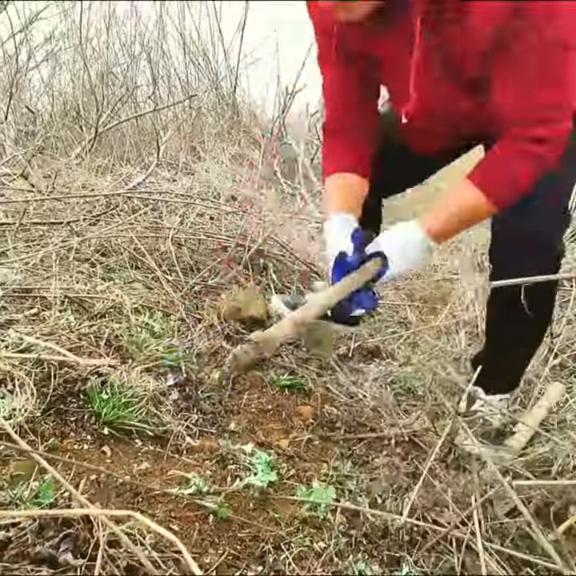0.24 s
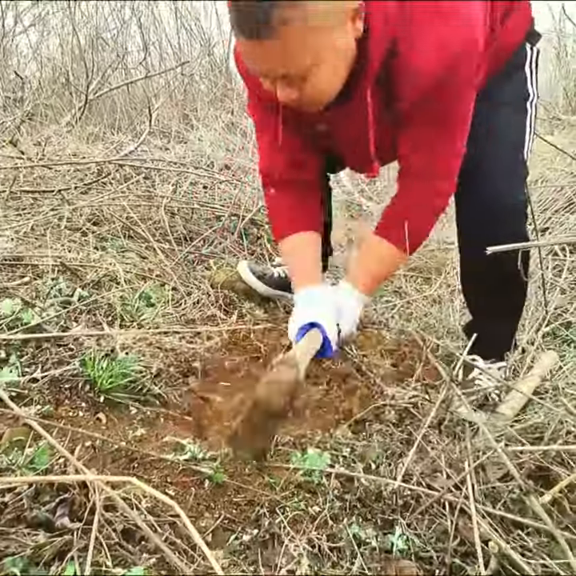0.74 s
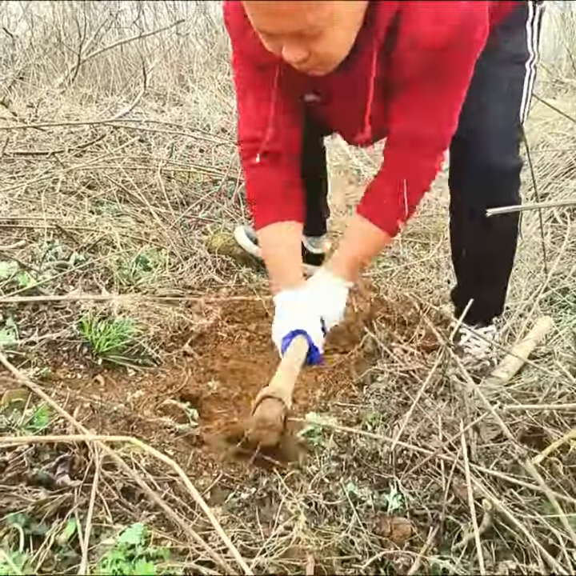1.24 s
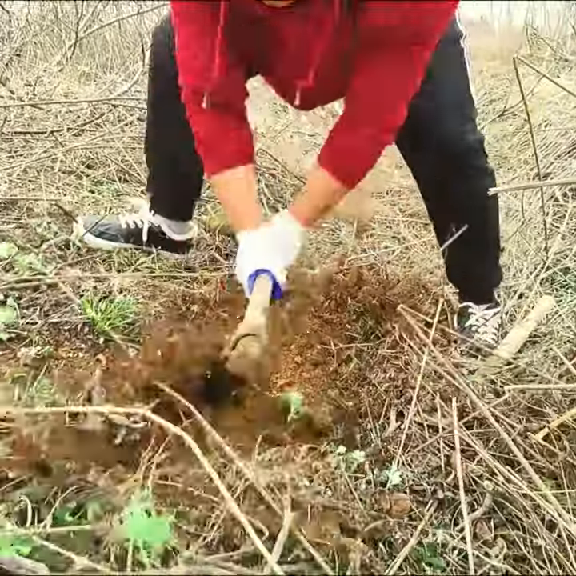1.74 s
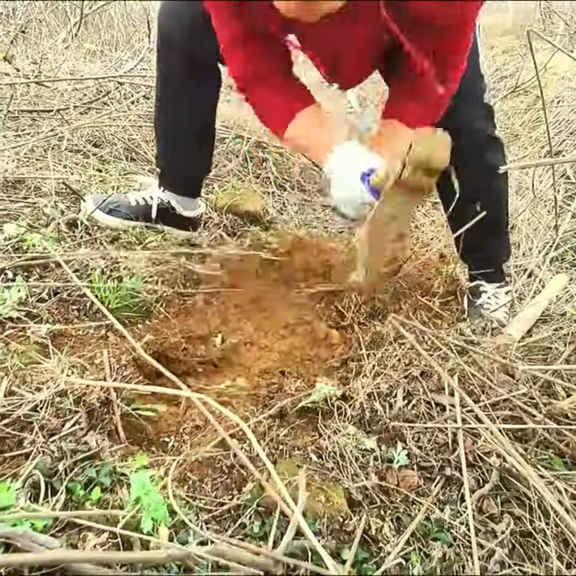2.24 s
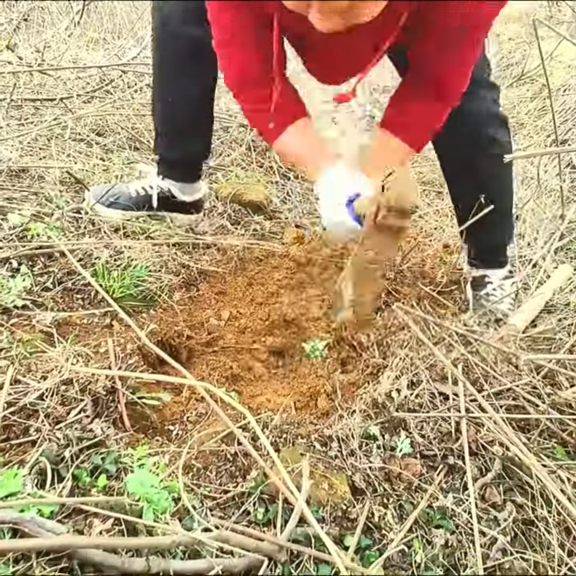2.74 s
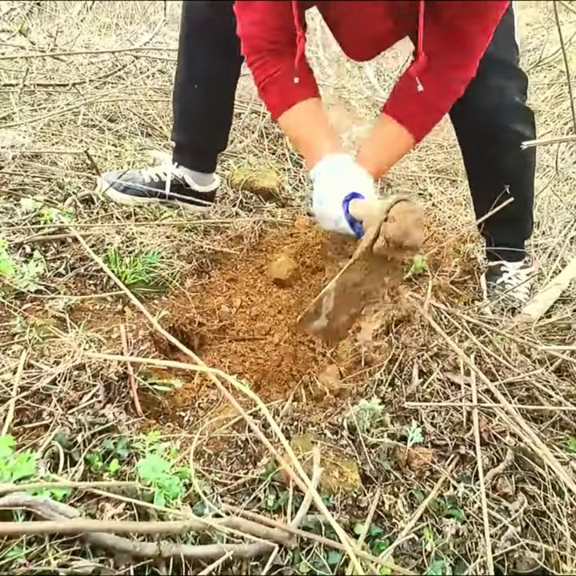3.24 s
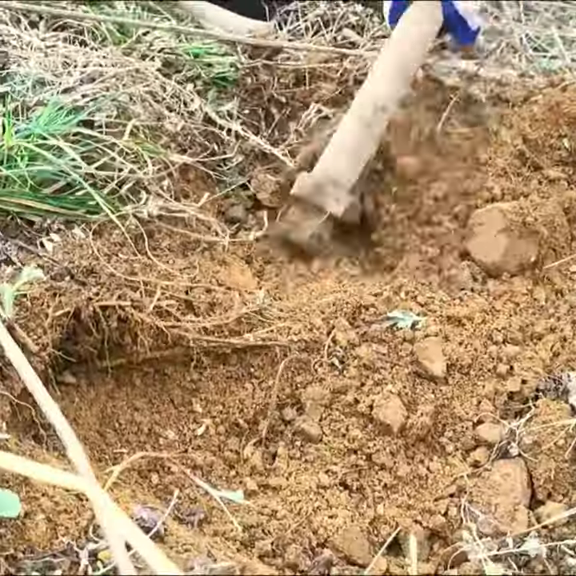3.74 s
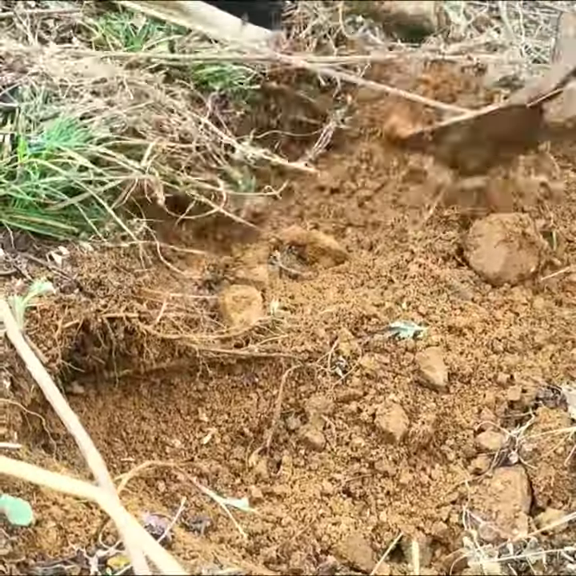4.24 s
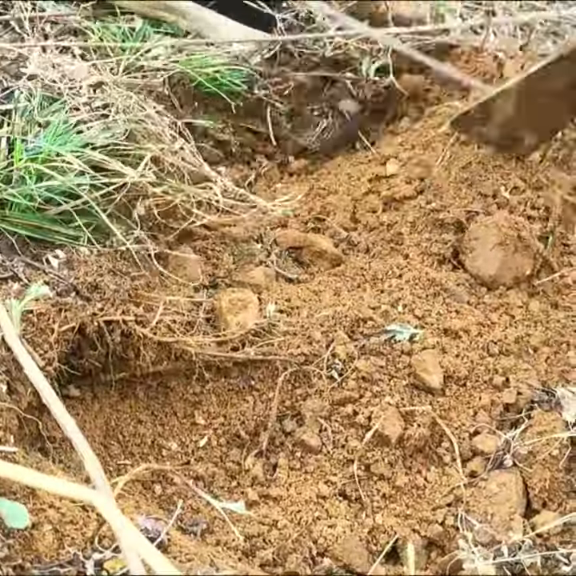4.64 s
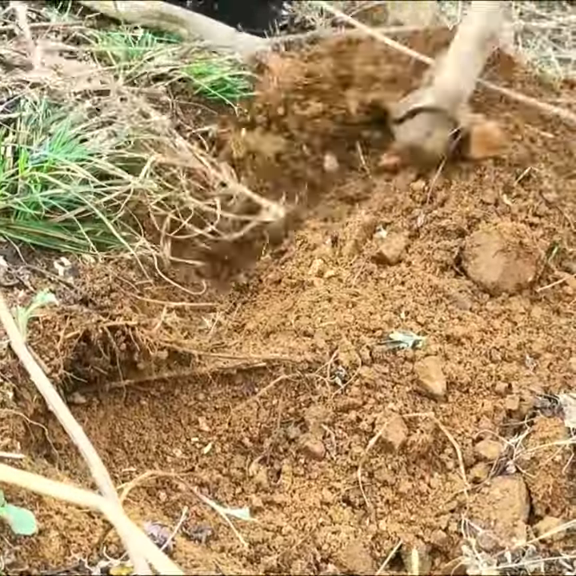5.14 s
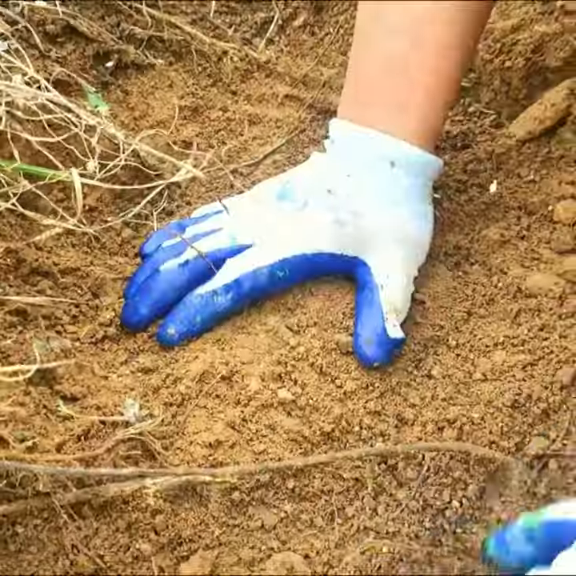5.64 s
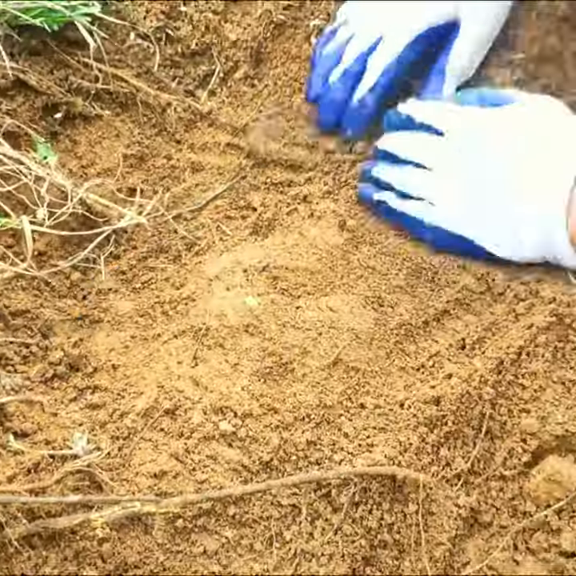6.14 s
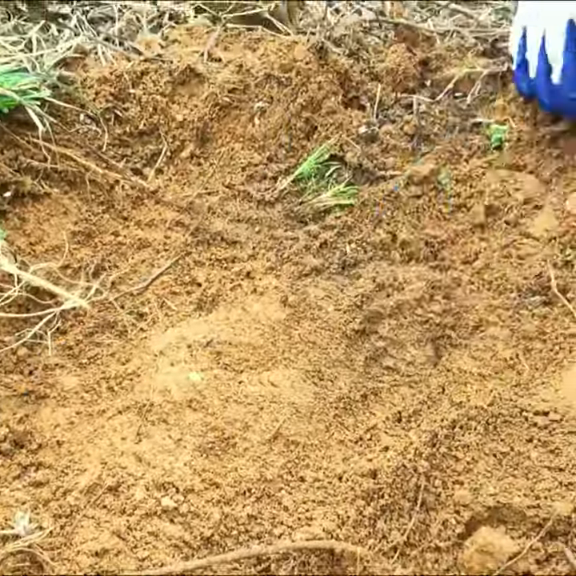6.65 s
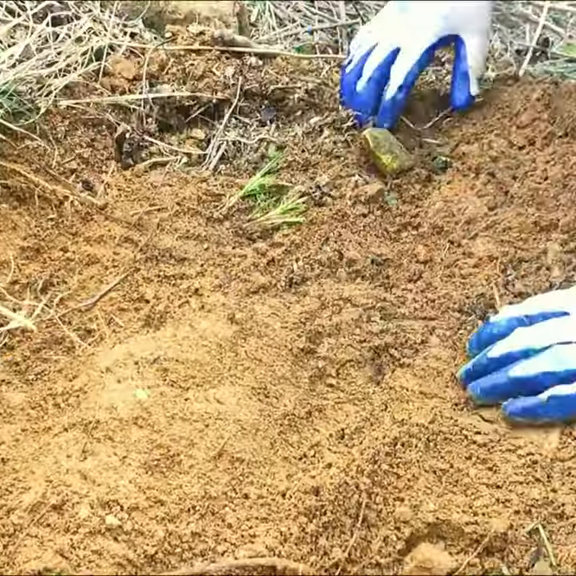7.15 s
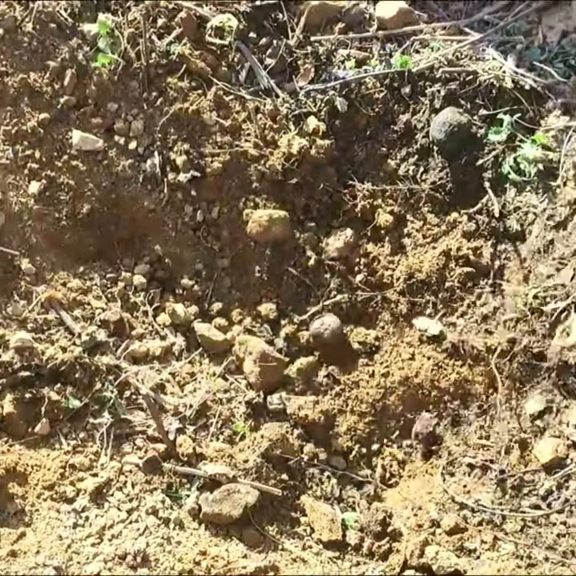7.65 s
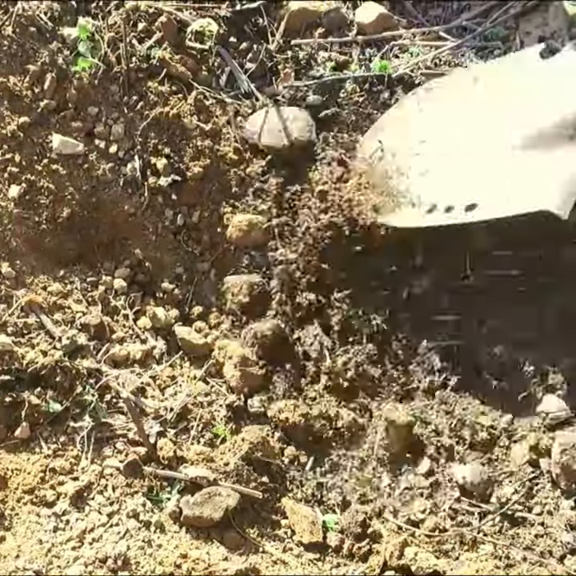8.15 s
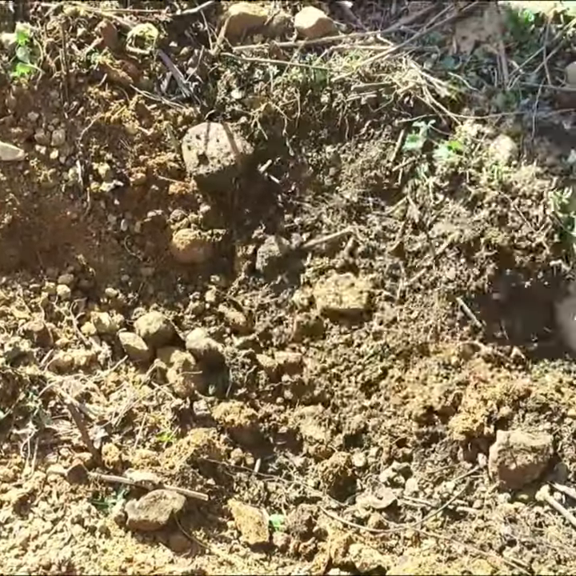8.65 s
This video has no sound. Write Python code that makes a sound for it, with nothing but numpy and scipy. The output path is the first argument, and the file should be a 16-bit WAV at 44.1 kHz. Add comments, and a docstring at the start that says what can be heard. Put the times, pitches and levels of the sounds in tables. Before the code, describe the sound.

Close, dry outdoor sound in stereo, with only a very faint low drone and hiss. From 0 to 0.4 s, dry grass and loose soil rustle and crackle. From 0.5 to about 3.1 s a hoe chops fast and irregularly, roughly five blows a second: short, crisp crunches with bright grit, thrown crumbs, and sharp pebble and twig clicks, the last ones weaker and duller. A tiny dip comes near 3.4 s. From 3.6 to 5.3 s closer, thuddier, earthy chops follow, with less spray; the last knock leaves a barely audible ring. After another dip at 5.5 s, gloved hands softly pat and sweep sandy soil until 7.2 s, much quieter. A third dip at 7.3 s leads to loud, coarse shovel stabs from 7.5 to 8.9 s, strongest around 7.8 to 8.1 s, crunching through stones with damped steel resonance, trickling soil and a final rough sweep.

```python
"""A hoe chops dry, crumbly earth at a quick pace: swelling bursts of crushed crumbs, each with its own tone colour,
and thrown soil. Softer, slower bursts are gloved hands patting the loose earth; harder ones that also excite the
blade's resonances are a steel shovel stabbing into stony ground. Soil trickles and rubs after the blades and in
sweeps, as fine fractures over hiss; pebbles and twigs give single cracks with a short crunch.
Filtered noise makes a faint outdoor drone, hum and hiss underneath; the level dips briefly three times."""
import sys
import numpy as np
from scipy import signal
from scipy.fft import rfft, irfft, next_fast_len
from scipy.io import wavfile
from scipy.ndimage import map_coordinates

SR = 44100
rng = np.random.default_rng(int(sys.argv[2]) if len(sys.argv) > 2 else 0)


def waveform_to_disk(signal):
    """Save audio, clipped to [-1, 1], as 16-bit WAV at the path in sys.argv[1]."""
    frames = np.transpose(np.atleast_2d(signal))
    scaled = np.clip(frames, -1, 1) * 32767
    samples = np.round(scaled).astype(np.int16)
    wavfile.write(sys.argv[1], SR, samples)


N = 391608

# Hoe strokes. Each row: peak in seconds, level in dB before the layer trim, fade in seconds per 10 dB,
# thud, grit and air (top treble) in dB, tone colour in Hz, thrown soil in dB before the trickle trim.
HOE_STROKES = [(0.492, -30, .011, -8, 2, 3, 3000, -46), (0.702, -43.7, .018, -1, -3, -5, 1720, -56),
               (0.889, -34.3, .005, -3, 0, 1, 1750, -58), (0.924, -43.5, .008, -10, -6, -12, 1880, -53),
               (1.201, -32.3, .0043, 1, 5, 3, 1040, -52), (1.376, -35.9, .009, -3, 1, 3, 400, -50),
               (1.578, -35.3, .02, -6, -4, -4, 1790, -51), (1.744, -44.5, .0055, 5, 6, 8, 950, -55),
               (1.816, -32, .008, -1, 1, 7, 2570, -50), (1.843, -33.3, .022, -5, 6, 12, 3000, -45),
               (1.998, -31.7, .0127, 0, -1, 4, 990, -52), (2.205, -33.8, .0065, -3, 3, 2, 2560, -51),
               (2.409, -32.1, .0085, -4, -1, -2, 2390, -48), (2.615, -37.3, .016, 1, 3, -3, 1000, -61),
               (2.748, -51, .008, 5, -4, 1, 920, -75), (2.925, -37.5, .009, 4, -7, -9, 560, -64),
               (2.993, -50, .0086, 2, -5, -8, 2550, -65), (3.128, -47, .009, 2, 0, 2, 2980, -60),
               (3.572, -45.3, .01, -1, -3, -3, 1920, -62), (3.864, -29.8, .01, -7, -1, -4, 2000, -61),
               (4.066, -32.5, .0095, -2, -5, -10, 1960, -61), (4.246, -33, .009, 4, -8, -13, 700, -60),
               (4.309, -42.4, .005, -3, -4, -13, 1870, -67), (4.437, -31.8, .008, 0, -5, -6, 720, -61),
               (4.626, -37.7, .01, 4, -5, -7, 700, -60), (4.654, -46, .011, 5, -9, -14, 690, -66),
               (4.828, -30.4, .01, -1, 1, -4, 1590, -62), (4.887, -48, .008, 4, -2, -2, 2040, -68),
               (5.025, -31.7, .0105, 1, 0, -4, 420, -65), (5.067, -45.5, .014, 5, -6, -4, 2350, -68),
               (5.223, -41.6, .009, 5, -6, -6, 2530, -66), (5.296, -43.3, .0044, -4, -5, -8, 760, -68)]
# Shovel strokes. Each row: peak in seconds, level in dB before the layer trim, swell and fade in seconds per 10 dB,
# thud, grit and air in dB, tone colour in Hz, left-right balance in dB.
SHOVEL_STROKES = [(7.507, -30, .007, .007, 6, 6, -2, 400, 8.6),
                  (7.595, -33.2, .015, .011, 2, 2, 1, 1500, 4.9),
                  (7.821, -25.7, .0073, .01, 2, -4, -3, 2460, -4.9),
                  (7.911, -28.3, .018, .0104, -4, 0, -4, 1600, 2.8),
                  (8.07, -26.4, .0073, .0073, 2, 0, 5, 950, -3),
                  (8.108, -35.5, .008, .01, 1, -2, -3, 3230, 3.4),
                  (8.218, -39.1, .0175, .018, -1, 2, 1, 1150, 4.1),
                  (8.262, -35.2, .012, .009, -5, -1, -5, 1280, 0),
                  (8.395, -31.2, .0085, .007, -4, 2, 3, 1460, -.5),
                  (8.492, -42.9, .019, .008, 0, 0, -3, 1050, 4.3),
                  (8.537, -47.5, .019, .012, 1, 3, -2, 2520, 2.5),
                  (8.592, -47.8, .012, .009, -10, 2, 0, 1080, 4.4),
                  (8.719, -32.9, .008, .0053, 0, -2, -2, 1000, 4.8),
                  (8.786, -43.3, .005, .011, 4, -1, -5, 950, 3),
                  (8.849, -40.9, .014, .012, 5, 0, -3, 1110, 2.6)]


def amp(db):
    """Decibels to gain."""
    return 10 ** (np.asarray(db) / 20)


def unit(x):
    """Scaled to rms 1."""
    return x / np.sqrt(np.mean(x ** 2) + 1e-20)


def along(points, hz):
    """Points of (Hz, value) read on a log frequency axis."""
    f, v = np.transpose(points)
    return np.interp(np.log(hz + 1), np.log(f + 1), v)


def curves(rows):
    """One value per sample for each column after the time."""
    s, *cols = np.transpose(rows)
    return [np.interp(np.arange(N) / SR, s, c) for c in cols]


def wobble(rate, size):
    """A smooth random curve with rate knots a second."""
    knots = rng.standard_normal(int(size * rate / SR) + 4)
    return map_coordinates(knots, [np.arange(size) * rate / SR])


def bump(hz, centre_hz, width_hz):
    """The shape of one resonance, 1 at its centre."""
    return 1 / (1 + ((hz - centre_hz) / width_hz) ** 2)


def swell(t, rise_s, fade_s):
    """A rounded peak at t = 0 whose flanks approach a slope of 10 dB per given time."""
    return amp(-10 * (np.hypot(t / np.where(t < 0, rise_s, fade_s), .5) - .5))


def coloured(x, gain_db):
    """Passes x through a causal minimum-phase filter whose gain in dB is a function of frequency."""
    n = x.shape[-1]
    m = 2 * next_fast_len(n // 2 + 2048)
    cepstrum = irfft(np.log(amp(gain_db(np.fft.rfftfreq(m, 1 / SR)))), m)
    # folding the cepstrum onto positive times makes the filter causal
    cepstrum[..., 1:m // 2] *= 2
    cepstrum[..., m // 2 + 1:] = 0
    return irfft(rfft(x, m) * np.exp(rfft(cepstrum)), m)[..., :n]


def crumbs(size, rate, spread_db, smooth):
    """Tiny fractures of uneven size, rate a second on average, over the smooth hiss of fine sand."""
    loudness = amp(spread_db * np.minimum(rng.exponential(size=size), 4))
    fractures = loudness * rng.choice([-1, 1], size) * (rng.random(size) < rate / SR)
    return unit(unit(fractures) + smooth * rng.standard_normal(size))


def scattered(x, scatter_db, t60, lag_s):
    """Stereo: the direct sound, on average slightly later at the left, plus treble scattered by the rough ground."""
    t = np.arange(SR // 25) / SR
    tail = rng.standard_normal((2, len(t))) * amp(-60 * t / t60)
    tail = coloured(tail, lambda hz: along([(200, -8), (900, -2), (2500, 1)], hz))
    paths = amp(scatter_db) * tail / np.linalg.norm(tail, axis=1, keepdims=True)
    lag = int(np.clip(rng.normal(lag_s, 7e-5) * SR, -12, 12))
    paths[0, max(lag, 0)] += 1
    paths[1, max(-lag, 0)] += 1
    return signal.fftconvolve(x[None], paths, axes=1)[:, :len(x)]


def panned(pair, pan_db):
    """Shifts the balance at equal power; positive is left."""
    gain = amp([[pan_db / 2], [-pan_db / 2]])
    return pair * unit(gain)


def bearing(bright_db):
    """Left-right dB of a contact: crisp dry grass lies to the left, dull bare soil to the right."""
    return 2.1 + .33 * bright_db


def add(track, s, pair):
    """Mixes a sound into the track from time s."""
    start = round(s * SR)
    part = pair[:, max(-start, 0):max(N - start, 0)]
    track[:, max(start, 0):][:, :part.shape[1]] += part


def outdoors(drone_gain_db, hum_gain_db, hiss_db):
    """A far drone and hum, nearly alike in both channels, and a faint even hiss, all of filtered noise."""
    # Distant noise. Each row: time in seconds, deep drone and hum in dB before their trims.
    rumble = [(0, -90, -88), (2.6, -88, -85), (3, -77, -79), (3.8, -72, -75), (4.4, -72, -74),
              (4.8, -72, -70), (5.42, -70.5, -69), (5.55, -80, -77), (6.7, -79, -76), (7.6, -84, -81),
              (8.88, -83, -79)]
    # Spectra of the drone, the hum and the hiss. Each row: frequency in Hz, gain in dB.
    drone_spectrum = [(20, -16), (45, -9), (62, -2), (78, 1), (105, -10), (200, -26), (600, -50)]
    hum_spectrum = [(60, -25), (120, -9), (160, 1), (220, -5), (320, -3), (410, -12), (1000, -24),
                    (3000, -45)]
    hiss_spectrum = [(100, 0), (500, 0), (1500, -3), (5000, -8), (8300, -9), (9500, -14), (15500, -18)]

    def far(spectrum):
        shared = rng.standard_normal(N)
        noise = shared + .4 * rng.standard_normal((2, N))
        return unit(coloured(noise, lambda hz: along(spectrum, hz)))

    drone_db, hum_db = curves(rumble)
    drone = far(drone_spectrum) * amp(drone_db + drone_gain_db)
    hum = far(hum_spectrum) * amp(hum_db + hum_gain_db)
    hiss = unit(coloured(rng.standard_normal((2, N)), lambda hz: along(hiss_spectrum, hz)))
    return drone + hum + amp(hiss_db) * hiss


def soil_flow():
    """Gains of trickle and rub: blades drag and throw soil, sweeps stir it; their powers add."""
    # Sweeps of a hand, foot or blade through grass and loose soil. Each row: peak in seconds,
    # trickle and rub in dB before their trims, swell and fade in seconds per 10 dB.
    sweeps = [(0.06, -41, -53, .035), (0.145, -48, -63, .025), (0.26, -42, -58, .04),
              (0.412, -46, -60, .018), (0.795, -50, -69, .05), (1.005, -52, -65, .02),
              (1.455, -52, -62, .025), (1.69, -53, -64, .04), (2.143, -45, -65, .017),
              (3.41, -59, -71, .035), (3.67, -60, -61, .07), (3.765, -59, -70, .025),
              (4.035, -56, -66, .02), (4.56, -60, -68, .03), (5.37, -67, -67, .12), (5.595, -55, -62, .027),
              (5.76, -53.5, -59, .04), (5.92, -53.5, -62, .035), (6.04, -63, -64, .07),
              (6.26, -60, -63, .06), (6.42, -58, -65, .035), (6.61, -61, -65, .05),
              (6.955, -54.5, -65, .065), (7.22, -57.5, -68, .022), (7.385, -52.5, -66, .042),
              (7.65, -57, -63, .02), (8.14, -57, -54, .03), (8.47, -58, -57, .03), (8.79, -55, -53, .02),
              (8.88, -47.5, -50, .03)]
    # A faint background rustle, varying slowly in level. Each row: time in seconds, rub in dB before its trim.
    rest_rub = [(0, -77), (2.9, -76), (3.6, -72), (5.2, -70), (7.1, -71), (7.9, -75), (8.88, -74)]
    throw_s, rise_s, settle_s = .042, .03, .044  # thrown soil: delay in s, swell and settling in s per 10 dB
    drag_db, drag_s, drag_fade_s = -26, .035, .042  # dragged soil: dB against the stroke, delay in s, s per 10 dB
    spill_db = -35  # soil running off the shovel, against its stroke
    rest_trickle_db = -75  # a faint, steady background hiss, before the trim

    t = np.arange(0, N / SR, .002)
    throws = [(row[0], row[-1]) for row in HOE_STROKES]
    throws += [(s, db + spill_db) for s, db, *_ in SHOVEL_STROKES]
    trickle = [amp(db) * swell(t - s - throw_s, rise_s, settle_s) for s, db in throws]
    rub = [amp(db + drag_db) * swell(t - s - drag_s, rise_s, drag_fade_s) for s, db, *_ in HOE_STROKES]
    rub += [amp(db + spill_db) * swell(t - s, rise_s, drag_fade_s) for s, db, *_ in SHOVEL_STROKES]
    for s, trickle_db, rub_db, length in sweeps:
        shape = swell(t - s, length, length)
        trickle.append(amp(trickle_db) * shape)
        rub.append(amp(rub_db) * shape)

    def total(parts, rest_db):
        return np.hypot(np.linalg.norm(parts, axis=0), amp(rest_db))

    rest_rub_db = np.interp(t, *np.transpose(rest_rub))
    return curves(np.transpose([t, total(trickle, rest_trickle_db), total(rub, rest_rub_db)]))


def loose_soil(trickle_flow, rub_flow, trickle_gain_db, rub_gain_db):
    """Fine crumbs patter on dry stalks while the mass of soil rubs along the ground."""
    # Spectra of the trickle and the rub. Each row: frequency in Hz, gain in dB.
    trickle_spectrum = [(300, -36), (1500, -15), (3000, -5), (4200, -2.5), (6000, -2), (7400, -1),
                        (8300, 1), (9400, -7), (12000, -7.5), (15500, -11)]
    rub_spectrum = [(60, -22), (200, -6), (400, -2), (1000, -2), (2000, 0), (3000, -2), (5000, -12),
                    (12000, -40)]

    # some crumbs are heard in both channels, most are scattered and differ
    near = crumbs(N, rate=400, spread_db=5.2, smooth=.65)
    wide = np.array([crumbs(N, rate=1800, spread_db=4.5, smooth=.95) for _ in range(2)])
    patter = (.6 * near + wide) * amp(1.5 * wobble(70, size=N))
    trickle = unit(coloured(patter, lambda hz: along(trickle_spectrum, hz)))

    # the sliding mass is uneven, and its bass is nearly alike in both channels
    mass = crumbs(N, rate=600, spread_db=4.5, smooth=.7)
    grit = np.array([crumbs(N, rate=900, spread_db=4.5, smooth=.8) for _ in range(2)])
    drag = coloured(mass, lambda hz: along([(500, 3), (2500, -7)], hz))
    drag = drag + coloured(grit, lambda hz: along([(200, -7), (1500, 0)], hz))
    rub = unit(coloured(drag * amp(1.8 * wobble(45, size=N)), lambda hz: along(rub_spectrum, hz)))

    trickle = panned(trickle, pan_db=2) * trickle_flow * amp(trickle_gain_db)
    return trickle + panned(rub, pan_db=1.5) * rub_flow * amp(rub_gain_db)


def small_ticks(flow, count):
    """Click rows for faint twigs and crumbs at random, likelier and louder where more soil trickles."""
    chance = np.cumsum(flow)
    at = np.searchsorted(chance, chance[-1] * (np.arange(count) + rng.random(count)) / count)
    rows = []
    for i, (a, b, c) in zip(at, rng.standard_normal((count, 3))):
        level_db = 20 * np.log10(flow[i]) - 4 + 2 * a
        rows.append((i / SR, level_db, 2.5 + 3 * b, 5 + 3 * c))
    return rows


def pebbles_and_twigs(trickle_flow, level_db, crunch, crunch_t60):
    """Each pebble struck or twig snapped gives one sharp crack and a few milliseconds of crunch."""
    # The loudest clicks. Each row: start in seconds, level in dB before the trim, knock and brightness in dB.
    loud_clicks = [(0.0529, -41.6, -2, 5), (0.0983, -43.4, 4, 7), (0.1312, -45.5, -2, 5),
                   (0.3198, -48, -1, 8), (0.426, -38.1, 0, 9), (0.4959, -26.9, -10, 8),
                   (0.5103, -41.7, -8, -9), (0.5522, -42.9, 3, 9), (0.706, -41, 2, -1),
                   (0.7388, -44.8, -2, 0), (0.8141, -40.4, -2, 9), (0.8875, -24.5, -4, 5),
                   (0.9234, -40.2, -7, 0), (1.201, -30.9, 3, 5), (1.2422, -40.5, 0, 2), (1.2726, -47, 3, 9),
                   (1.3759, -34.8, -6, 4), (1.3825, -38.2, 3, 6), (1.4517, -45.8, -2, 9),
                   (1.5375, -47.5, 2, 9), (1.5894, -34.4, -2, -4), (1.5989, -38.9, -1, -2),
                   (1.7755, -45, 1, 9), (1.8139, -28.3, 0, 6), (1.989, -34.3, 3, 6), (2.001, -27.4, 1, 2),
                   (2.1601, -46.7, 4, 6), (2.2045, -26, 1, 8), (2.2723, -44.8, -1, -6),
                   (2.4145, -34.9, 1, 0), (2.6205, -29.5, 4, 5), (2.7463, -44.1, 13, -4),
                   (2.9313, -31.5, 13, -5), (2.9922, -42.9, 1, -9), (3.1738, -49.5, 9, -6),
                   (3.3404, -52.6, 5, 2), (3.5694, -41, 6, 0), (3.9141, -52, 1, 2), (4.0358, -49, 4, 9),
                   (4.0683, -29.5, 1, -5), (4.0847, -42.9, 3, 0), (4.1301, -48.4, 8, -9),
                   (4.3077, -34.6, 2, -5), (4.4404, -29.7, 9, -4), (4.5507, -51, 5, 3),
                   (4.6554, -36, 8, -13), (4.7253, -44, -1, 7), (4.8869, -45.7, 6, 3),
                   (5.066, -40.1, 10, -4), (5.294, -35.3, -1, -2), (6.0502, -53.5, 8, -3),
                   (6.2199, -53.6, 3, 5), (7.0255, -53.4, -4, -6), (7.0754, -52.7, 0, -2),
                   (7.5723, -39, -8, -4), (7.7085, -51.5, 5, -1), (7.9105, -24.7, -10, -2),
                   (8.071, -30, -5, -4), (8.1066, -31, -8, -6), (8.2193, -38.9, 0, 4),
                   (8.2393, -35.6, -9, -10), (8.3969, -28.2, -7, -2), (8.4518, -44.5, -4, -8),
                   (8.4892, -40.5, -4, 1)]
    # Spectrum of a crack. Each row: frequency in Hz, gain in dB.
    pebble_spectrum = [(50, -20.2), (120, -17.5), (250, -12.3), (500, -5.8), (1000, -2.6), (2500, -0.5),
                       (5500, 0.0), (8000, -0.3), (9500, -9.8), (15500, -21.7)]

    track = np.zeros((2, N))
    t = np.arange(SR // 20) / SR
    for s, db, knock_db, bright_db in list(loud_clicks) + small_ticks(trickle_flow, count=16):
        crack = crunch * rng.standard_normal(len(t)) * amp(-60 * t / crunch_t60)
        crack[0] += 1
        hardness = [(600, knock_db), (1300, 0), (2800, 0),
                    (5000, bright_db), (8000, bright_db), (11000, bright_db - 4)]
        crack = coloured(crack, lambda hz: along(pebble_spectrum, hz) + along(hardness, hz))
        crack = unit(scattered(crack, scatter_db=-4, t60=.014, lag_s=4e-5))
        add(track, s, panned(crack, bearing(bright_db)) * amp(db + level_db))
    return track


def strokes(table, soil, ring, tone_db, grain_db, judder_db, lag_s):
    """A blade or hand crushes crumbs, swelling as it enters the ground and fading as the soil brakes it."""
    track = np.zeros((2, N))
    t = np.arange(-SR // 6, SR // 5) / SR  # around the peak of the stroke
    for s, db, rise, fade, thud_db, grit_db, air_db, tone_hz, pan_db in table:
        # deep bites thud, shallow ones hiss
        depth = [(700, thud_db), (1100, 0), (3000, 0), (4000, grit_db), (8500, grit_db), (9500, air_db)]
        # each stroke has its own broad resonance, a tone colour, beside any ring of the tool
        modes = [(tone_hz, 80, tone_db)] + list(ring)

        def colour(hz):
            resonance = np.max([level * bump(hz, f, width) for f, width, level in modes], axis=0)
            return along(soil, hz) + along(depth, hz) + resonance

        crush = crumbs(len(t), rate=5000, spread_db=grain_db, smooth=.7)
        crush = crush * amp(judder_db * wobble(300, size=len(t)))
        crush = unit(scattered(coloured(crush, colour), scatter_db=0, t60=.025, lag_s=lag_s))
        contact = amp(-9 * np.maximum(-t / rise - 2.6, 0))  # falls off steeply before the edge touches
        add(track, s + t[0], panned(crush, pan_db) * swell(t, rise, fade) * contact * amp(db))
    return track


def glove_pats():
    """Soft, slow strokes of the hands, all with one swell and fade."""
    # Gloves pressing and patting. Each row: peak in seconds, level in dB before the layer trim,
    # thud and grit in dB, tone colour in Hz.
    pats = [(5.632, -50.3, -12, -6, 1900), (5.77, -51.5, -9, -4, 2450), (5.918, -53, -4, -1, 2050),
            (6.175, -59, 6, 4, 540), (6.595, -54.5, -2, 1, 290), (6.685, -55.5, 0, 4, 250)]
    # Spectrum of soil under a glove. Each row: frequency in Hz, gain in dB.
    glove_soil = [(60, -16), (200, -4), (400, -4), (800, -5), (1500, -2), (2200, 0), (4000, -4), (6000, -4),
                  (8300, -1), (9500, -8), (15500, -16)]
    swell_s, fade_s, pan_db = .016, .02, 2  # swell and fade in s per 10 dB; left-right dB
    air_db = -6  # top treble of a glove against its grit
    rows = [(s, db, swell_s, fade_s, thud, grit, grit + air_db, hz, pan_db)
            for s, db, thud, grit, hz in pats]
    return strokes(rows, glove_soil, [], tone_db=6, grain_db=4.5, judder_db=1.8, lag_s=1e-4)


def shovel_stabs():
    """The shovel crushes stony soil while its steel resonates, damped by the earth."""
    # Spectrum of soil under the shovel. Each row: frequency in Hz, gain in dB.
    shovel_soil = [(50, -29), (110, -20), (200, -13), (400, -11.5), (700, -9.5), (1200, -4), (2200, -1.8),
                   (3200, -3.3), (4300, -5.4), (6000, -4.6), (8000, -4.4), (9500, -14), (12000, -14.5),
                   (15500, -30)]
    # Blade resonances. Each row: frequency in Hz, width in Hz, gain in dB.
    blade = [(1450, 120, 1.5), (2450, 45, 4), (3080, 90, 4), (4490, 60, 2), (6450, 130, 4), (7430, 110, 5)]
    return strokes(SHOVEL_STROKES, shovel_soil, blade, tone_db=5, grain_db=3.5, judder_db=1.5, lag_s=1.4e-4)


def hoe_ring():
    """Lifted clear of the soil after its last knock, the hoe blade rings on faintly as a decaying sine."""
    # The ring: start in seconds, frequency in Hz, level in dB, time to fade 60 dB in seconds.
    ring_settings = (5.294, 1120, -69, .5)
    s, hz, db, t60 = ring_settings
    t = np.maximum(np.arange(N) / SR - s, 0)
    return amp(db - 60 * t / t60) * np.sin(2 * np.pi * hz * t)


def hoe_blows():
    """Every blow of the hoe enters the ground with the same swell and is braked at its own rate."""
    # Spectrum of soil under the hoe. Each row: frequency in Hz, gain in dB.
    hoe_soil = [(50, -19.6), (110, -18.6), (200, -13.9), (400, -5.8), (700, -3), (950, -3), (1250, -5.2),
                (2200, -2.7), (3200, -3.2), (4300, -1), (6000, 0.3), (8000, -1.4), (9500, -12.3),
                (12000, -16.9), (15500, -22.8)]
    swell_s = .007  # s per 10 dB as the edge enters the ground
    rows = [(s, db, swell_s, fade, thud, grit, air, hz, bearing((grit + air) / 2))
            for s, db, fade, thud, grit, air, hz, _ in HOE_STROKES]
    return strokes(rows, hoe_soil, [], tone_db=4.5, grain_db=4, judder_db=1.5, lag_s=4e-5)


def scene():
    """Hoe, hands and shovel on open ground."""
    air = outdoors(drone_gain_db=-.8, hum_gain_db=-1.3, hiss_db=-76.5)
    trickle_flow, rub_flow = soil_flow()
    spill = loose_soil(trickle_flow, rub_flow, trickle_gain_db=-.2, rub_gain_db=-.6)
    stones = pebbles_and_twigs(trickle_flow, level_db=-12.2, crunch=.14, crunch_t60=.011)
    hands = amp(.4) * glove_pats()
    shovel = amp(-.3) * shovel_stabs()
    hoe = amp(-.1) * hoe_blows() + hoe_ring()
    return air + spill + stones + hands + shovel + hoe


def record(dry):
    """Colours left and right differently, dips the level briefly three times and limits the band."""
    # Colour difference of the channels. Each row: frequency in Hz, left against right in dB.
    channel_colour = [(100, 0), (700, -.5), (1300, -.5), (2400, -4), (4400, -.5), (8100, 3.5), (10500, -1),
                      (15000, -4.5)]
    # Brief dips. Each row: centre in seconds, half length in seconds to the middle of each slope.
    dips = [(3.381, .021), (5.482, .028), (7.286, .02)]
    top_hz = 15900

    pair = coloured(dry, lambda hz: along(channel_colour, hz) * np.array([[.5], [-.5]]))
    t = np.arange(N) / SR
    for s, half in dips:
        depth = np.clip((half - abs(t - s)) / .022 + .5, 0, 1)  # slopes of 22 ms
        pair = pair * amp(-29 * depth)
    m = next_fast_len(N + SR // 2)
    return irfft(rfft(pair, m) * (np.fft.rfftfreq(m, 1 / SR) < top_hz), m)[:, :N]


dry = scene()
out = record(dry)
waveform_to_disk(out)
```